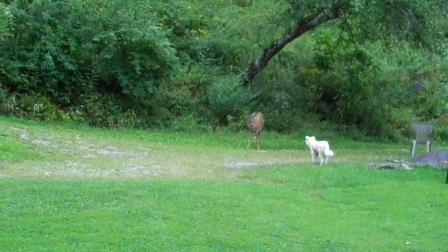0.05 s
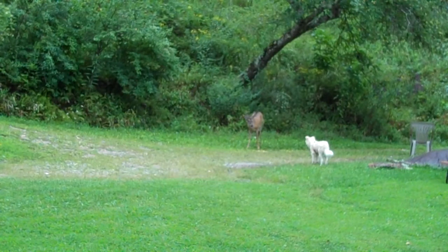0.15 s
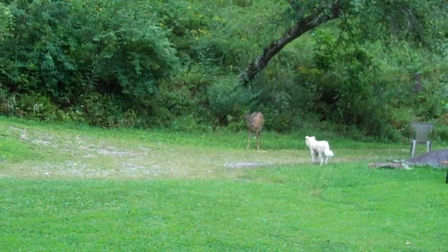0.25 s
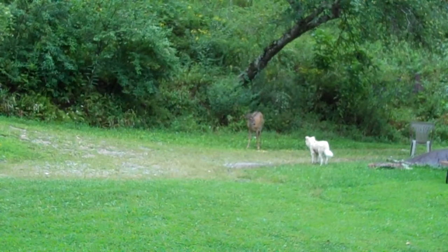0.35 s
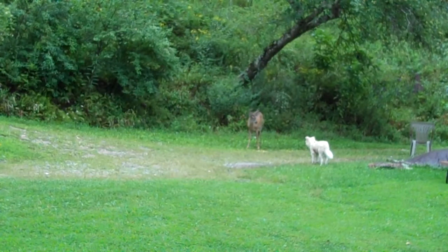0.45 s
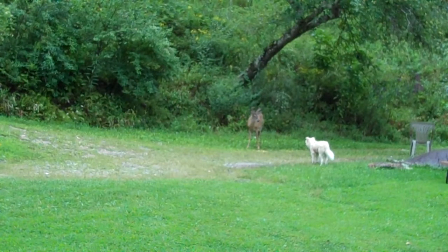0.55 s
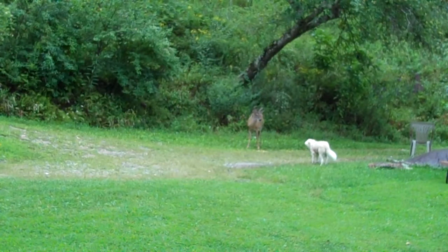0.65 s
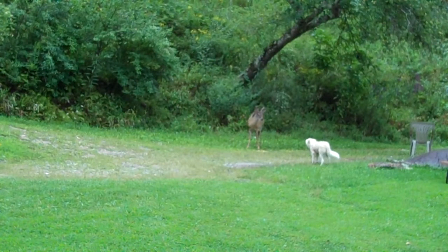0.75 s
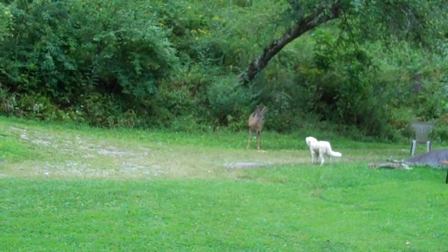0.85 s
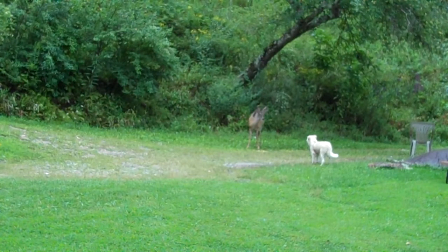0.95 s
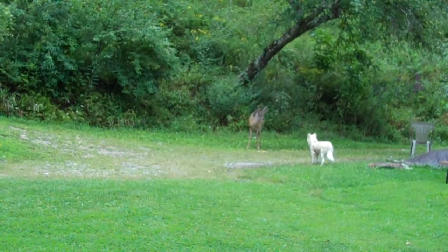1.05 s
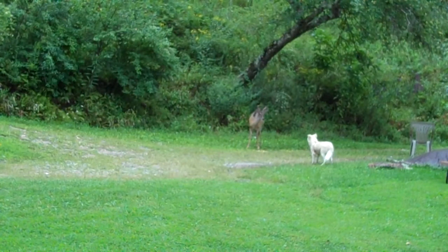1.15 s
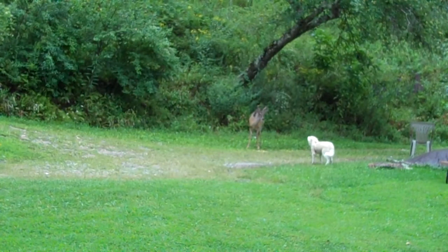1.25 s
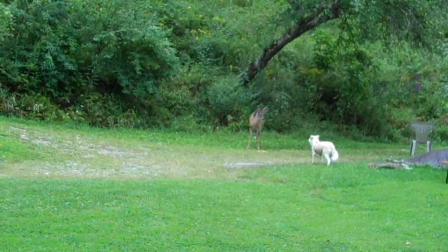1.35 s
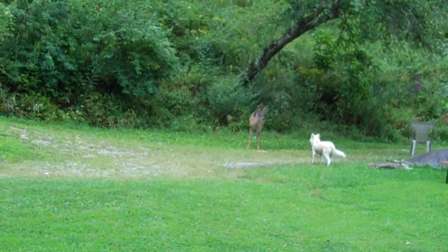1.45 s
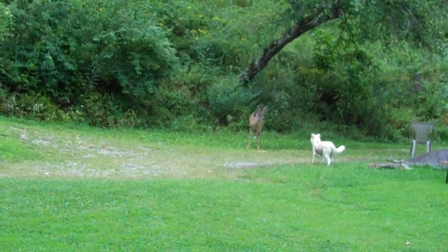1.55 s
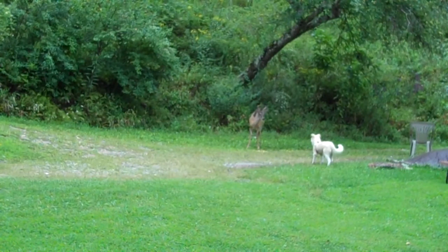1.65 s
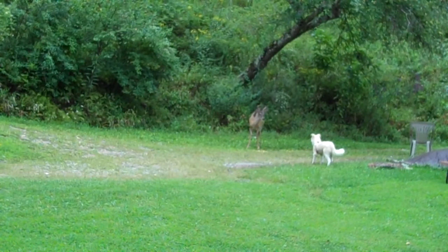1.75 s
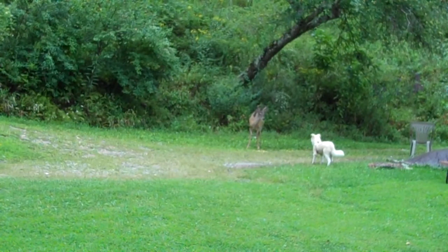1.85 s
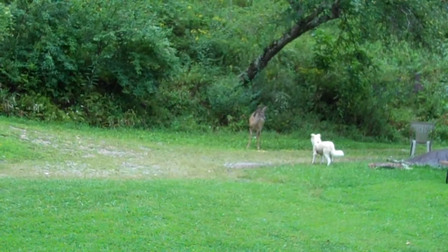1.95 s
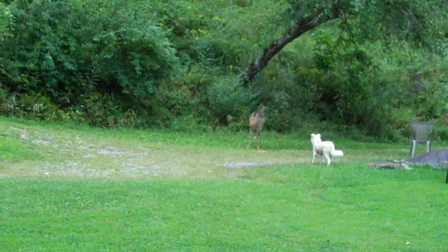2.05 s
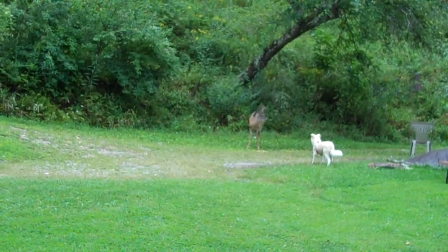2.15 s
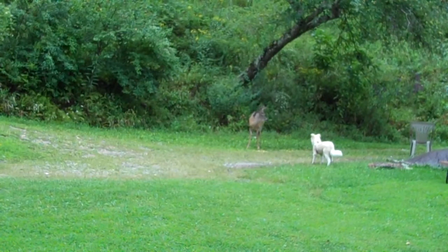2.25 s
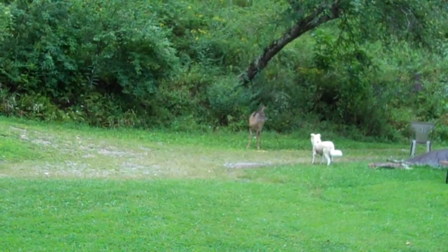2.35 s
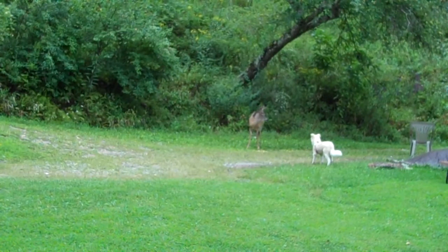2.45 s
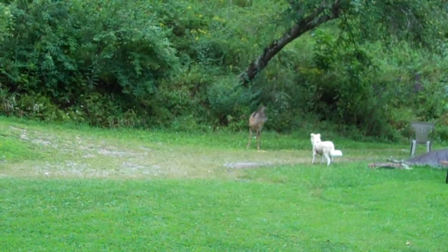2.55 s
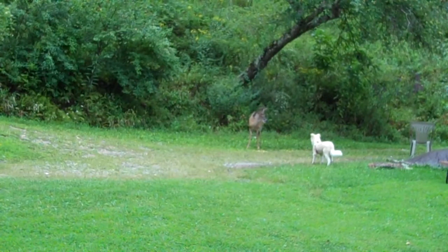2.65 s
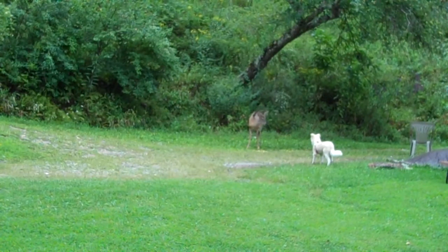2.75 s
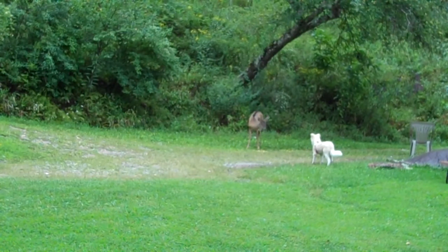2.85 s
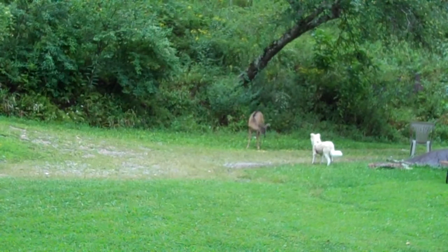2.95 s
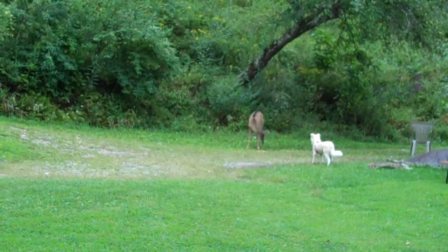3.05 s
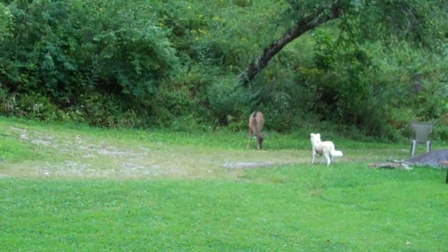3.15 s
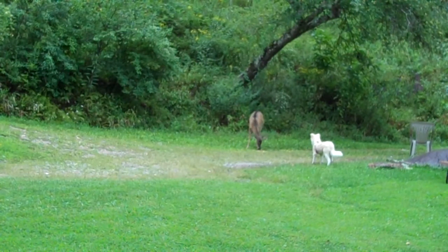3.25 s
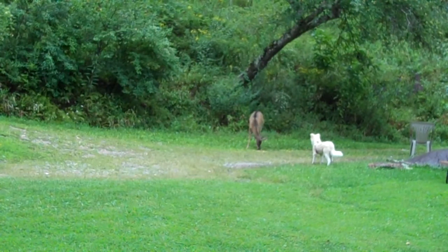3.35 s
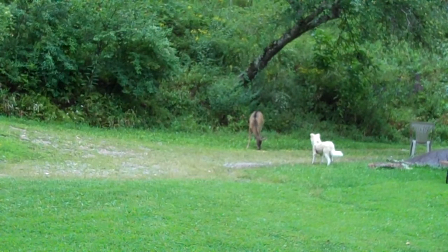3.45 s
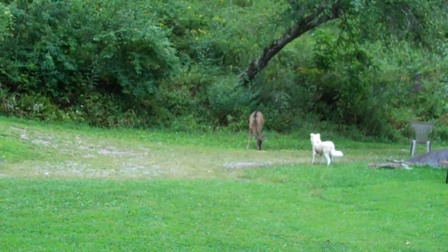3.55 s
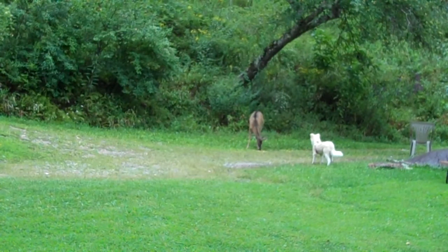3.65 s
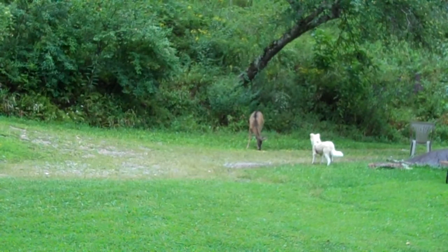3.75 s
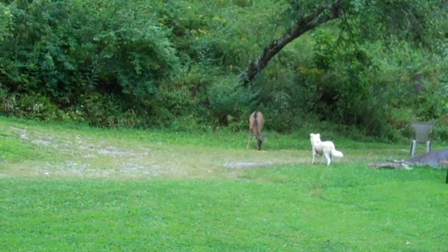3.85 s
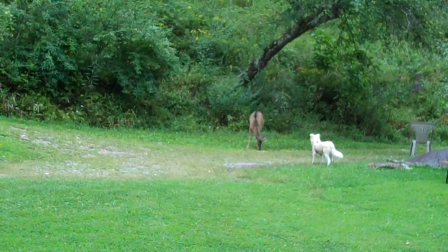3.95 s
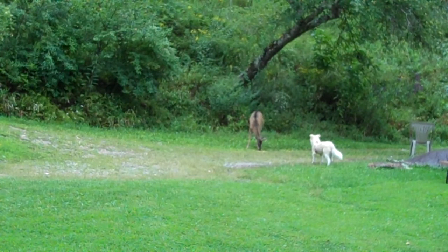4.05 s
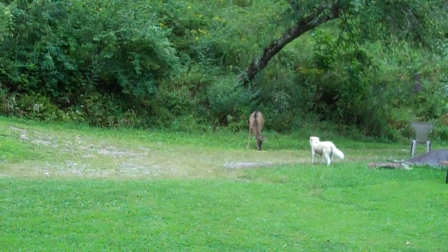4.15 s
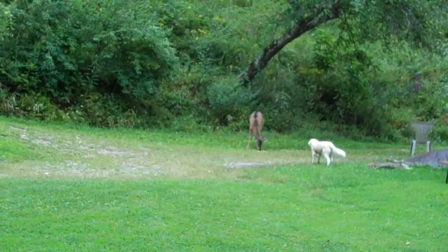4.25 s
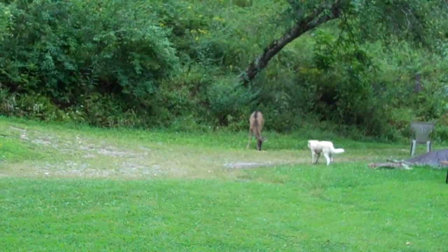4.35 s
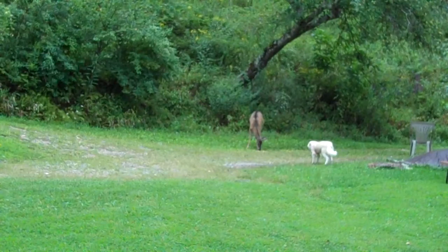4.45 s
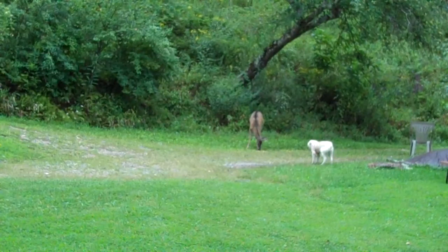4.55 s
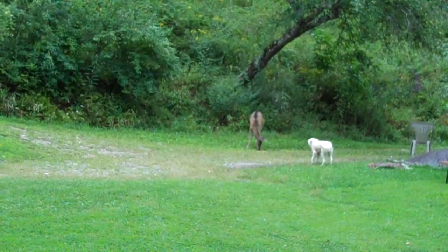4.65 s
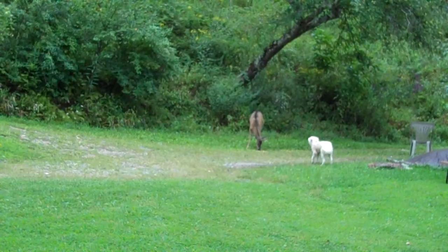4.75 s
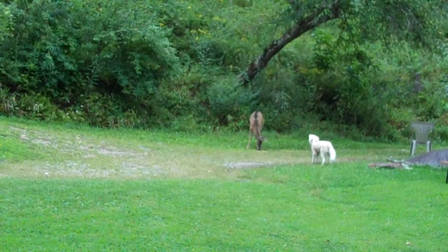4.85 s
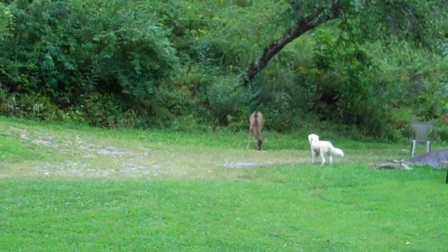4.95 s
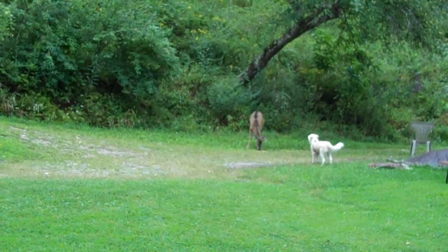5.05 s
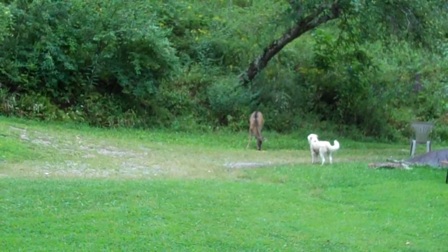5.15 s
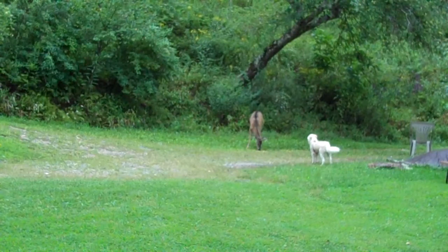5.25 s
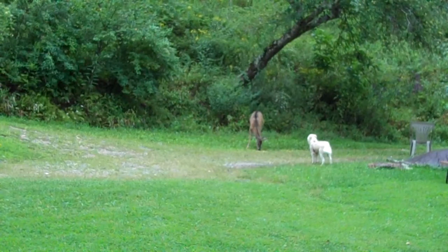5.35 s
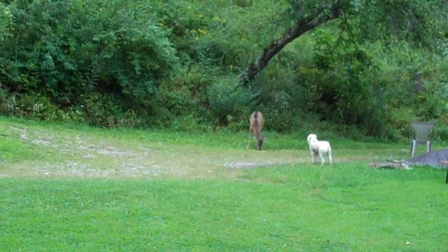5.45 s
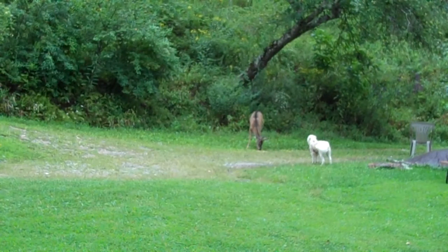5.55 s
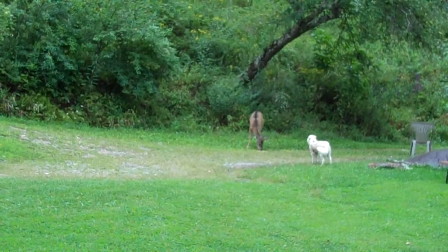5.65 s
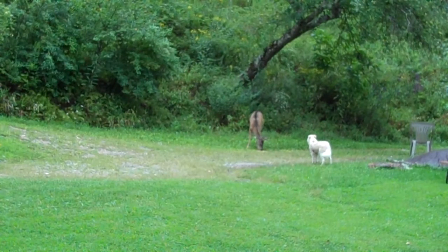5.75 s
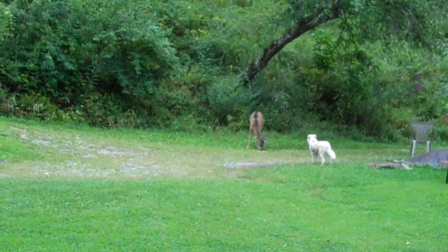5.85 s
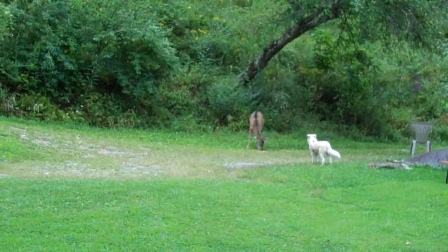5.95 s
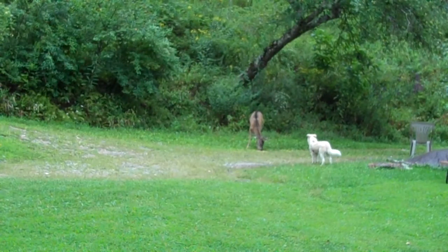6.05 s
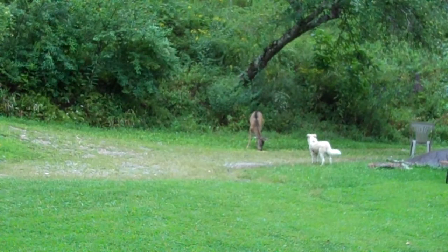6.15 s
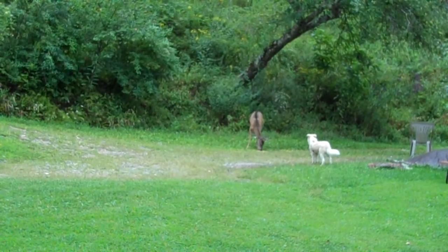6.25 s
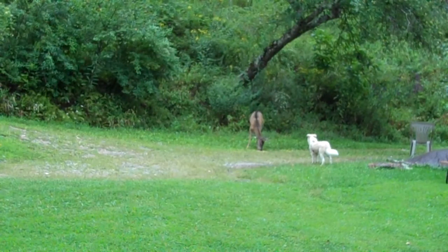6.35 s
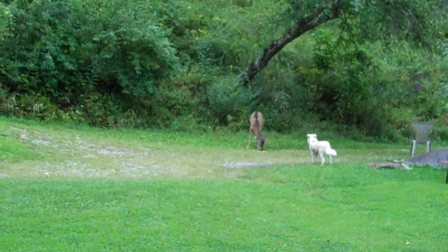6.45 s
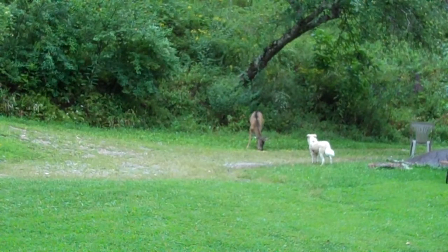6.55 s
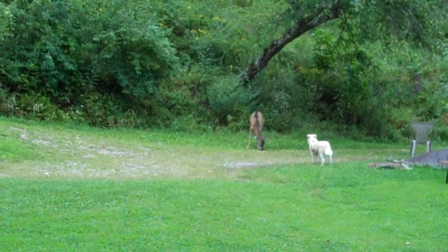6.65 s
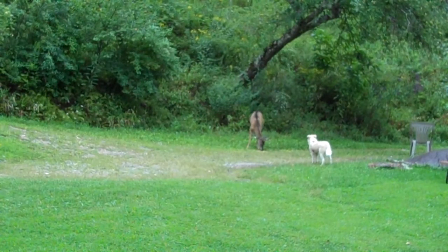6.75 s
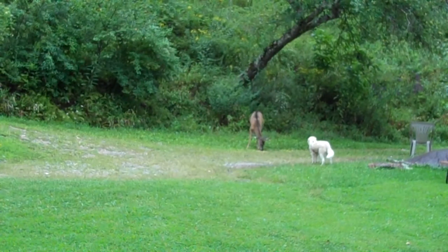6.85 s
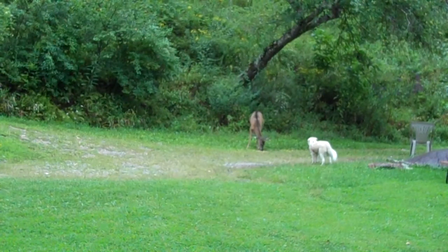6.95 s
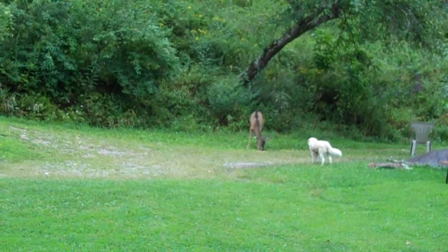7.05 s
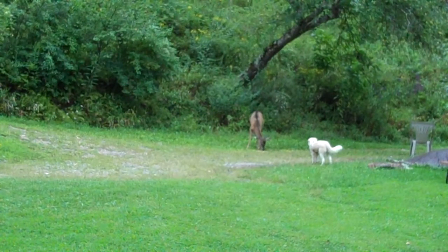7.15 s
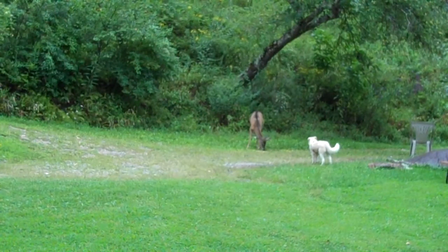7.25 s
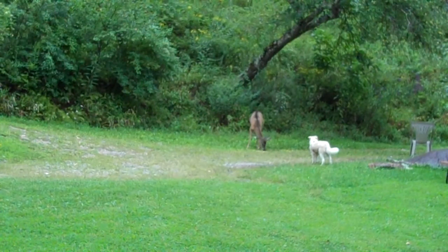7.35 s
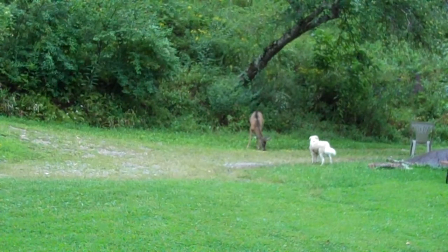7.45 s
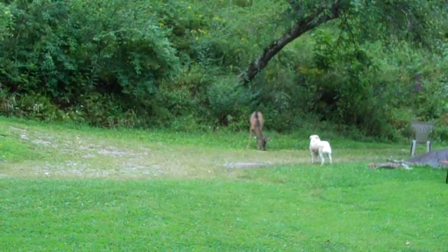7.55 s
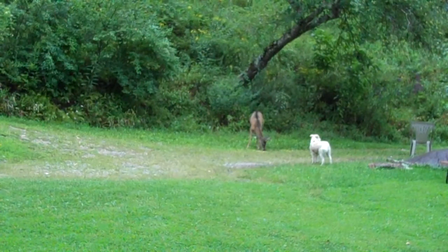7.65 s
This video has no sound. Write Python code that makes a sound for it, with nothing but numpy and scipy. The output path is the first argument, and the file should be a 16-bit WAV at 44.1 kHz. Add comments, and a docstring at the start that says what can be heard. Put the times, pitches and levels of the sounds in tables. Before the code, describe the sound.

Outdoors on a lawn beside woods, crickets and massed insects shimmer steadily while a katydid chirps about three times a second. A puppy gives three quick yaps, pauses, then four closely spaced hoarser barks and one more, and finally two strong barks. The trees return short echoes and a soft tail. Thin bird calls come from the left. Stereo microphone, puppy some distance away.

```python
"""A lawn below a wooded slope: a puppy barks in three quick bursts and the slope throws the barks back.
Barks are fold pulses ringing a moving throat and mouth; the trees return echoes and noise scatter.
Birds are bent, shaken sines; crickets and a katydid are tones pulsed by wing strokes.
Shaped noise gives the air and massed insects; slowly wavering tones give a faint hum."""
import sys
import numpy as np
from scipy import signal
from scipy.fft import rfft, irfft, next_fast_len
from scipy.io import wavfile
from scipy.ndimage import uniform_filter1d

SR = 44100
rng = np.random.default_rng(int(sys.argv[2]) if len(sys.argv) > 2 else 0)


def put_to_file(sound):
    """Save the sound as 16-bit audio at rate SR, in the file named by the first command-line argument."""
    columns = np.atleast_2d(sound).T  # one column per channel
    safe = np.clip(columns, -1, 1)
    whole_steps = np.round(safe * 32767)
    wavfile.write(sys.argv[1], SR, whole_steps.astype(np.int16))


N = 339129
TIME_S = np.arange(N) / SR

# colour of the sound the wooded slope returns: hz, gain_db
SLOPE_COLOUR = [(200, -28), (430, 6), (600, -1), (860, 6.5), (1300, -1.5), (1700, 0), (2600, 8),
                (8000, 10.5)]


def gain_of(db):
    """Decibels to amplitude."""
    return 10 ** (np.asarray(db) / 20)


def evened(x):
    """Scales to rms 1."""
    return x / np.sqrt(np.mean(abs(x) ** 2) + 1e-20)


def levelled(x, size=441):
    """Holds the running rms at 1; size in samples."""
    power = uniform_filter1d(uniform_filter1d(x ** 2, size), size)
    return x / np.sqrt(abs(power) + 1e-14)


def read(points, hz, axis=1):
    """Reads one column of a spectrum on a log-frequency axis."""
    table = np.transpose(points)
    return np.interp(np.log(hz + 1), np.log(table[0] + 1), table[axis])


def curves(rows):
    """Sample times and every column of a table, joined by straight lines."""
    s, *columns = np.transpose(rows)
    t = np.arange(s[0], s[-1], 1 / SR)
    return [t] + [np.interp(t, s, column) for column in columns]


def add(mix, start_s, sound):
    """Mixes a sound in at start_s, with soft ends."""
    part = mix[max(round(start_s * SR), 0):][:len(sound)]
    part += (sound * signal.windows.tukey(len(sound), .08))[:len(part)]


def drift(count, hz):
    """Complex noise of rms 1 that changes about hz times a second."""
    f = np.fft.fftfreq(next_fast_len(count), 1 / SR)
    white = rng.standard_normal((len(f), 2)) @ [1, 1j]
    return evened(np.fft.ifft(white * np.exp(-(f / hz) ** 2))[:count])


def angle(hz):
    """Running phase of a pitch curve, in radians."""
    return 2 * np.pi * np.cumsum(hz) / SR


def panned(x, left_db):
    """Places a sound by its left-right level difference."""
    gains = gain_of([[left_db / 2], [-left_db / 2]])
    return x * gains / gains.mean()


def around(peak_s, rise_s, fall_s):
    """Sample times of one call, and their distance from its peak in rise or fall times."""
    t = np.arange(max(peak_s - 2 * rise_s, 0), peak_s + 2 * fall_s, 1 / SR)
    return t, (t - peak_s) / np.where(t < peak_s, rise_s, fall_s)


def after(s, change_s=.004):
    """A soft switch from 0 to 1 as s passes zero."""
    return .5 + .5 * np.tanh(s / change_s)


def puppy(bark_db=-1.0, overtone_db=-14, undertone_db=-11):
    """Barks from driven resonances, with near-pure grumbles and a whimper between them."""
    # barks, level before bark_db: start_s, tone_clears_s, peak_s, rise_s, fall_s, level_db, pitch_hz,
    # climb_oct_per_s, clear_roughness (0-1), throat_hz, mouth_hz, mouth_over_throat_db, lip_ring_db
    bark_rows = [(.794, .83, .849, .046, .062, -24.9, 439, .4, .16, 600, 1810, 0, -17),
                 (1.016, 1.054, 1.073, .046, .055, -24.6, 429, -.5, .13, 680, 1620, 2, -28),
                 (1.403, 1.428, 1.472, .055, .052, -25, 422, 0, .06, 740, 1510, 5, -22),
                 (4.416, 4.43, 4.472, .056, .049, -24.2, 452, 1.8, .2, 780, 1570, 1, -26),
                 (4.616, 4.63, 4.663, .05, .06, -25.2, 455, .8, .36, 640, 1720, -5.5, -25),
                 (4.816, 4.842, 4.861, .04, .08, -27, 520, -1.2, .46, 590, 1590, -7.5, -30),
                 (5.038, 5.06, 5.1, .056, .082, -27.8, 414, -1, .28, 770, 1400, 0, -32),
                 (5.712, 5.74, 5.786, .068, .06, -27.8, 432, 2.6, .34, 850, 1460, .5, -23),
                 (7.018, 7.028, 7.066, .036, .056, -20.1, 439, 1.2, .02, 740, 1640, 4, -18.5),
                 (7.236, 7.258, 7.302, .045, .047, -23.3, 424, .2, .03, 780, 1610, 3, -30)]
    # soft grumbles, one list each: time_s, pitch_hz, level_db
    grumble_rows = [
        [(1.33, 232, -52), (1.37, 282, -62), (1.41, 342, -45)],
        [(5.2, 346.4, -58), (5.38, 318, -53.5), (5.52, 297, -49), (5.63, 274, -62), (5.71, 322, -41.5)],
        [(7.4, 294, -59), (7.56, 250, -61), (7.69, 311.5, -49)],
    ]
    # one thin whimper: time_s, pitch_hz, level_db
    whimper_rows = [(5.46, 554, -56), (5.5, 610, -58.5), (5.53, 598, -52), (5.57, 516, -62)]
    # harmonic balance of the whimper: hz, gain_db
    whimper_colour = [(600, -1), (1200, -2), (1800, 0), (2450, 7), (3000, 4), (3800, -14)]
    out = np.zeros(N)
    for *row, lip_db in bark_rows:
        add(out, *bark(row, lip_db))
    out *= gain_of(bark_db)

    for rows in grumble_rows:
        t, hz, db = curves(rows)
        phase = angle(hz * (1 + 0.024 * drift(len(t), 55).real))
        overtone = gain_of(overtone_db) * np.sin(2 * phase)
        undertone = gain_of(undertone_db) * np.sin(phase / 2)  # the folds beat strong, weak, strong
        add(out, t[0], gain_of(db) * evened(np.sin(phase) + overtone + undertone))

    t, hz, db = curves(whimper_rows)
    phase = angle(hz * (1 + 0.035 * drift(len(t), 120).real))
    whimper = sum(gain_of(read(whimper_colour, k * hz)) * np.sin(k * phase) for k in range(1, 7))
    add(out, t[0], gain_of(db) * evened(whimper))
    return out


def bark(row, lip_db, throat_width_hz=500, mouth_width_hz=330, lip_hz=2710, lip_width_hz=310,
         jitter=0.12, shimmer=0.99, hiss_db=-2, damping=0.2, rasp_db=7):
    """Fold pulses, ragged at both ends of the bark, ring a throat and a mouth that open and shut."""
    # broad colour of the voice: hz, gain_db
    voice_colour = [(120, -43), (250, -5.5), (430, 2.5), (600, 9.5), (760, -2), (980, 10), (1280, 1),
                    (1780, 0.5), (2150, -0.5), (2750, -5.5), (3100, -9.5), (4500, 1), (8000, -45)]
    t, hz, rough, loudness, throat_hz, mouth_hz, mouth_db = gesture(*row)
    rough = np.clip(rough, 0, .95)
    phase = angle(hz * (1 + jitter * rough * drift(len(t), 182).real))
    strength = np.exp(shimmer * rough * drift(len(t), 330).real)  # hoarse folds close with uneven force
    folds = evened(strength * sum(np.cos(k * phase) for k in range(1, 15)))
    puffs = evened((1 + 0.23 * np.cos(phase)) * rng.standard_normal(len(t)))  # air escapes once a cycle
    drive = (1 - rough) * folds + gain_of(hiss_db) * np.sqrt(2 * rough) * puffs
    f, at, z = signal.stft(drive, SR, nperseg=512, noverlap=448)
    z = z * gain_of(read(voice_colour, f))[:, None]

    def ring(centre_hz, width_hz):
        """One moving resonance, applied twice for steep skirts."""
        centre, width = (np.interp(at, t - t[0], c * np.ones(len(t))) for c in (centre_hz, width_hz))
        offset = f[:, None] - centre
        resonant = z / (1 + 2j * offset / width) ** 2
        return levelled(signal.istft(resonant, nperseg=512, noverlap=448)[1][:len(t)], size=400)

    upper = gain_of(mouth_db) * ring(mouth_hz, mouth_width_hz)
    lower = ring(throat_hz, throat_width_hz * (1 + rough * damping))  # leaky folds damp the throat
    lips = gain_of(lip_db + rasp_db * rough) * ring(lip_hz, lip_width_hz)  # thin edge, stronger when hoarse
    return t[0], loudness * (levelled(lower + upper) + lips)


def gesture(start_s, clear_s, peak_s, rise_s, fall_s, level_db, top_hz, climb_oct_per_s, clear_rough,
            throat_hz, mouth_hz, mouth_db):
    """One push of effort sets the level, pitch, roughness and jaw opening of a bark."""
    # cracks into a higher register: middle_s, length_s, pitch_hz, extra_effort_db, throat_hz
    crack_rows = [(1.036, .018, 528, 4, 550), (4.497, .042, 520, 2, 620), (4.684, .044, 540, 1.5, 580),
                  (4.866, .046, 558, 1.5, 575), (5.82, .076, 515, 1.5, 860), (7.114, .024, 490, 0, 620)]
    slope_db, rounding = 19, .55  # loss per rise or fall time on the flanks; width of the rounded top
    rise_oct_per_db, fall_oct_per_db, crack_oct_per_db = .025, .024, .007  # the high register sags less
    hold_db = 5  # the pitch barely gives way over the first few dB
    throat_oct_per_db, mouth_oct_per_db, mouth_db_per_db = .028, .005, .3  # the jaw closes as effort drops
    rough_start, rough_end, break_s = .5, .58, .03  # breaks up again this long after the peak
    shut_db = 12  # closing mouth: extra loss per fall time, after the first

    t, u = around(peak_s, rise_s, fall_s)
    slack_db = slope_db * (np.hypot(u, rounding) - rounding)
    sag_oct = slack_db ** 2 / (slack_db + hold_db) * np.where(u < 0, rise_oct_per_db, fall_oct_per_db)
    unsteady = 1 + .008 * drift(len(t), 70).real
    hz = top_hz * 2 ** (climb_oct_per_s * (t - peak_s) - sag_oct) * unsteady
    ragged_onset = (rough_start - clear_rough) * after(clear_s - t)
    ragged_end = (rough_end - clear_rough) * after(t - peak_s - break_s)
    rough = clear_rough + ragged_onset + ragged_end
    effort_db = level_db - slack_db
    throat = throat_hz * 2 ** (-slack_db * throat_oct_per_db)
    for s, length_s, crack_hz, extra_db, crack_throat_hz in crack_rows:
        high = after(length_s / 2 - abs(t - s))
        hz = hz + high * (crack_hz * 2 ** (-slack_db * crack_oct_per_db) - hz)
        effort_db = effort_db + high * extra_db
        throat = throat + high * (crack_throat_hz - throat)
    loudness = after(t - start_s) * gain_of(effort_db - shut_db * np.maximum(u - 1, 0))
    mouth = mouth_hz * 2 ** (-slack_db * mouth_oct_per_db)
    return t, hz, rough, loudness, throat, mouth, mouth_db - mouth_db_per_db * slack_db


def bushes(x, scatter_db=-17, decay_s=0.028):
    """Nearby bushes smear each bark with a short, soft scatter."""
    t = TIME_S[:SR // 5]
    taps = rng.standard_normal(len(t)) * t * np.exp(-2 * t / decay_s)
    return x + gain_of(scatter_db) * signal.oaconvolve(x, taps / np.linalg.norm(taps))[:N]


def echoed(x, echo_db=-2):
    """Adds distinct echoes from the edge of the wood, coloured by their path over the grass."""
    # echoes, level before echo_db and the slope colour: delay_s, level_db
    echo_rows = [(0.037, -21.5), (.062, -17), (.115, -26), (0.239, -23), (.41, -36)]
    colour = gain_of(read(SLOPE_COLOUR, np.fft.rfftfreq(N, 1 / SR)))
    returned = gain_of(echo_db) * irfft(rfft(x) * colour, N)
    return x + sum(gain_of(db) * np.interp(TIME_S - delay_s, TIME_S, returned, left=0)
                   for delay_s, db in echo_rows)


def beside(x, lag_s=.00003):
    """The puppy stands to the right: the left microphone hears it later and slightly recoloured."""
    # level difference of the two sides: hz, left_minus_right_db
    lean_points = [(200, 2), (420, -1), (700, -2.2), (1100, 0), (1700, 1.4), (2700, 1)]
    hz = np.fft.rfftfreq(N, 1 / SR)
    lean = gain_of(read(lean_points, hz) / 2) * np.exp(-1j * np.pi * hz * lag_s)
    return irfft(rfft(x) * np.array([lean, 1 / lean]), N)


def trees(x, build_s=0.011, spacing=20):
    """Scatter from the wooded slope: sparse taps that swell, then die band by band."""
    # time for the scatter to fall 60 dB: hz, t60_s
    t60_points = [(200, 0.5), (900, 2.22), (1700, 1.73), (3500, 2.2), (8000, 0.49)]
    count = 2 * SR // spacing
    taps = np.zeros((2, 2 * SR))
    places = np.arange(count) * spacing + rng.integers(0, spacing, (2, count))  # one tap per slot
    np.put_along_axis(taps, places, rng.choice([-1., 1.], (2, count)), 1)
    hz, t, z = signal.stft(taps, SR, nperseg=256)
    t60_s = read(t60_points, hz)
    z = paired(z, hz) * gain_of(-60 * t / t60_s[:, None]) * (1 - np.exp(-t / build_s))
    energy = t60_s * SR / spacing / np.log(10 ** 6)  # of the decaying taps, divided out
    z *= (gain_of(read(SLOPE_COLOUR, hz)) / np.sqrt(energy))[:, None]
    return signal.fftconvolve(x[None], signal.istft(z, SR, nperseg=256)[1], axes=1)[:, :N]


def paired(z, hz):
    """Two microphones hear diffuse sound alike from about 130 to 500 Hz, unrelated in deepest bass and treble."""
    # left-right likeness: hz, likeness (0-1)
    likeness = [(30, 0), (65, 0.049), (130, 0.86), (500, 0.98), (1350, 0.52), (2900, 0.22), (14000, 0)]
    same = np.clip(read(likeness, hz), -1, 1)[:, None]
    return np.array([z[0], same * z[0] + np.sqrt(1 - same ** 2) * z[1]])


def bird(notes, waver_hz, bend_hz, level_db, note_db=12):
    """Whistles that swell and fade, bend at both ends, and shake; a wide shake lisps."""
    out = np.zeros(N)
    for peak_s, rise_s, fall_s, hz, db in notes:
        t, u = around(peak_s, rise_s, fall_s)
        pitch_hz = hz + bend_hz * np.tanh(u ** 2 / 2) + waver_hz * drift(len(t), 350).real
        swell = gain_of(db + level_db - note_db * u ** 2)  # note_db down one rise or fall time from the peak
        add(out, t[0], swell * evened(np.sin(angle(pitch_hz))))
    return out


def birds(high_wet_db=-6, whistle_wet_db=-10.5):
    """High calls on the left and a farther bird's arched whistles, each scattered by the trees."""
    # levels before the level_db trims below; all three tables: peak_s, rise_s, fall_s, pitch_hz, level_db
    # high, lisping calls
    lisp_rows = [(.01, .03, .05, 8400, -43), (.15, .1, .11, 7620, -39), (.86, .05, .06, 8240, -54),
                 (1.11, .03, .04, 8100, -47), (1.2, .07, .14, 7560, -39), (1.39, .05, .13, 7900, -45),
                 (1.985, .05, .055, 7720, -38.5), (2.12, .06, .14, 8200, -53),
                 (3.91, .04, .06, 8100, -42.5), (5.135, .06, .05, 8040, -55), (7.085, .06, .06, 8100, -54),
                 (7.335, .05, .06, 8200, -52), (7.555, .03, .06, 8000, -50)]
    # purer high notes
    pipe_rows = [(3.06, .08, .05, 8270, -49.5), (3.665, .025, .04, 8880, -48), (3.85, .05, .06, 8570, -48),
                 (4.105, .04, .04, 8390, -41), (4.155, .03, .04, 8280, -42), (4.25, .04, .04, 8400, -49),
                 (4.34, .06, .13, 8600, -45), (6.15, .07, .05, 8700, -57)]
    # arched whistles
    whistle_rows = [(2.265, .045, .04, 2770, -61), (2.32, .03, .03, 2580, -64),
                    (4.91, .075, .11, 3290, -51), (5.035, .03, .04, 3190, -53), (6.01, .09, .11, 3460, -59),
                    (6.1, .07, .09, 3230, -58), (6.88, .07, .11, 3155, -49), (7.59, .07, .08, 3340, -51),
                    (7.685, .025, .05, 3190, -51)]
    high = bird(lisp_rows, waver_hz=450, bend_hz=400, level_db=-4)
    high += bird(pipe_rows, waver_hz=110, bend_hz=120, level_db=-4)
    whistles = bird(whistle_rows, waver_hz=70, bend_hz=-500, level_db=-0.5)
    left = panned(high + gain_of(high_wet_db) * trees(high), 15)
    return left + whistles + gain_of(whistle_wet_db) * trees(whistles)


def katydid(hz=7340, waver_hz=110, scrapes_per_s=66, half_length_s=0.042, level_db=-48.5, spread_db=1.5,
            left_db=11):
    """Short chirps of nearly equal strength, each a fast train of wing scrapes."""
    # chirps, about three a second: middle_s
    chirp_s = [.14, .9, 1.2, 1.58, 1.989, 2.27, 2.56, 2.82, 3.11, 3.41, 3.72, 4.02, 4.36, 4.75, 5.11, 5.449,
               5.799, 6.14, 6.501, 7.0, 7.4]
    sizes = gain_of(spread_db * rng.standard_normal(len(chirp_s)))
    swell = sum(size / (1 + ((TIME_S - s) / half_length_s) ** 4) for s, size in zip(chirp_s, sizes))
    rate = scrapes_per_s * (1 + 0.081 * drift(N, 3.07).real)
    scrapes = np.exp(1.7 * np.cos(angle(rate)))
    tone = np.sin(angle(hz + waver_hz * drift(N, 485).real))
    return panned(gain_of(level_db) * swell * evened(tone * scrapes), left_db)


def crickets(sweep_hz=130):
    """Each wing stroke swells and slides down in pitch; foliage blurs the tone."""
    # nearer trilling crickets: pitch_hz, width_hz, strokes_per_s, level_db, left_minus_right_db
    trill_rows = [(6010, 315, 19.5, -49.5, -60), (6460, 500, 19.8, -56, 11)]
    out = np.zeros((2, N))
    for hz, width_hz, strokes_per_s, db, left_db in trill_rows:
        stroke = angle(strokes_per_s * (1 + .02 * drift(N, 2).real))
        slide = angle(hz - sweep_hz * np.sin(stroke))
        tone = (drift(N, width_hz / 2) * np.exp(1j * slide)).real
        out += panned(gain_of(db) * evened(tone * np.exp(1.3 * np.cos(stroke))), left_db)
    return out


def rustles():
    """A faint rustle in the grass: a short puff of band noise."""
    # puffs: start_s, centre_hz, width_hz, length_s, level_db
    rustle_rows = [(0.518, 1860, 1200, 0.045, -52.5)]
    out = np.zeros(N)
    for start_s, hz, width_hz, length_s, db in rustle_rows:
        t = TIME_S[:round(length_s * SR)]
        band = (drift(len(t), width_hz) * np.exp(2j * np.pi * hz * t)).real
        add(out, start_s, gain_of(db) * np.hanning(len(t)) * evened(band))
    return out


def background(air_db=0, chorus_db=0, patchy_db=1.78):
    """Soft air noise, and countless far insects whose bands flicker separately."""
    # air of the yard, power per Hz: hz, level_db
    air_points = [(25, -104), (60, -86), (90, -111), (150, -86), (300, -81.5), (450, -80), (650, -87),
                  (900, -88), (1300, -92.5), (1530, -92.5), (1900, -95.5), (3500, -95), (10000, -105),
                  (14000, -105)]
    # massed insects, power per Hz before the flicker: hz, left_db, right_db
    chorus_points = [(3360, -115, -115), (3780, -101, -101), (4194, -85, -88), (4750, -79.5, -76),
                     (5400, -75, -74), (5800, -78, -70), (6220, -69.5, -67.5), (6370, -75, -64.5),
                     (6440, -68, -78), (6980, -77.5, -76.5), (7410, -73, -100), (7940, -85, -98),
                     (8700, -96, -112), (10800, -110, -125)]
    noise = rng.standard_normal((4, N)) * np.sqrt(SR / 2)
    hz, _, z = signal.stft(noise, SR, nperseg=1024, noverlap=768)
    patches = uniform_filter1d(rng.standard_normal(z[2:].shape), 8, 1)
    patches = evened(uniform_filter1d(patches, 5, 2))
    insects = gain_of([read(chorus_points, hz, axis=1), read(chorus_points, hz, axis=2)])[:, :, None]
    air = paired(z[:2], hz) * gain_of(air_db + read(air_points, hz))[:, None]
    chorus = z[2:] * insects * gain_of(chorus_db + patchy_db * patches)
    return signal.istft(air + chorus, nperseg=1024, noverlap=768)[1][:, :N]


def hum(waver=0.63):
    """A faint drone of distant machinery: tones of wavering strength and phase."""
    # drone tones: pitch_hz, width_hz, level_db
    hum_rows = [(59, 1.4, -80.5), (117.4, 7, -75.5), (203.3, 12, -62), (411, 39, -64), (595, 36, -62.5),
                (1500, 54, -68)]
    out = np.zeros(N)
    for hz, width_hz, db in hum_rows:
        tone = ((1 + waver * drift(N, width_hz)) * np.exp(2j * np.pi * hz * TIME_S)).real
        out += gain_of(db) * evened(tone)
    return out


def scene(dog_wet_db=-12):
    """The puppy with its echoes, birds in the bushes, insects all round."""
    dog = puppy()
    barking = beside(echoed(bushes(dog))) + gain_of(dog_wet_db) * trees(dog)
    return barking + birds() + katydid() + crickets() + rustles() + background() + hum()


def record(dry, edge_hz=14150):
    """The recorder's band limit."""
    lowpass = signal.firwin(1023, edge_hz, window=("kaiser", 9), fs=SR)
    return signal.oaconvolve(dry, lowpass[None], "same")


dry = scene()
out = record(dry)
put_to_file(out)
```